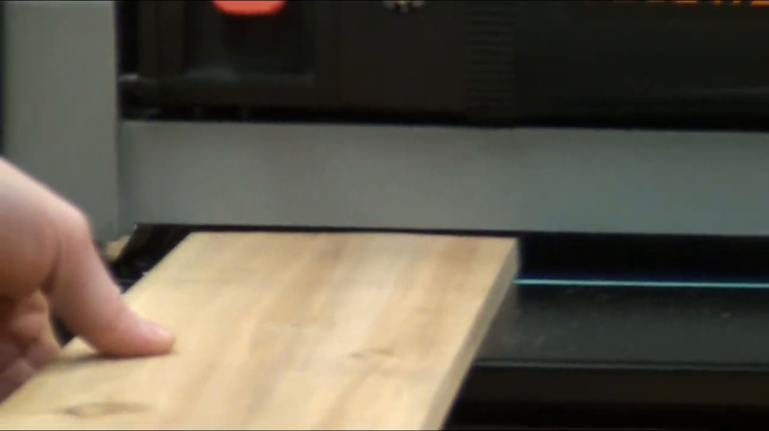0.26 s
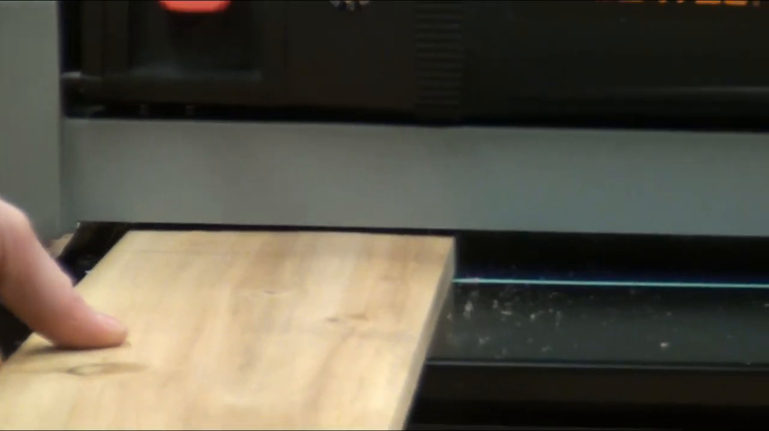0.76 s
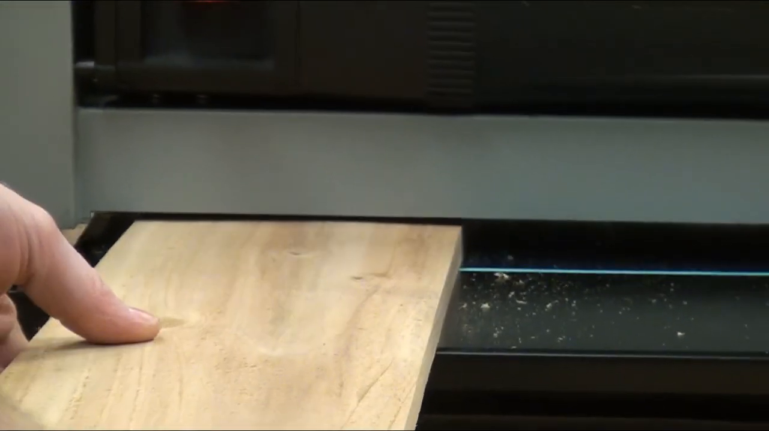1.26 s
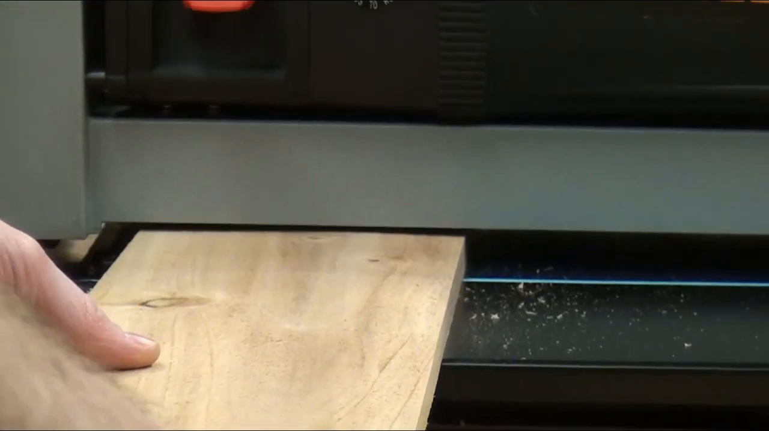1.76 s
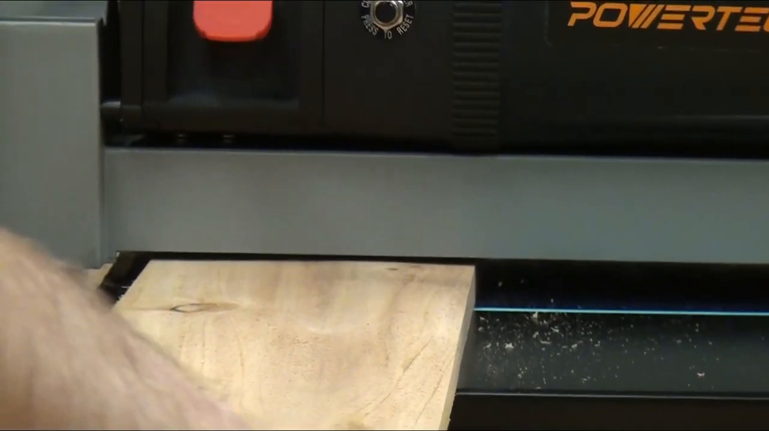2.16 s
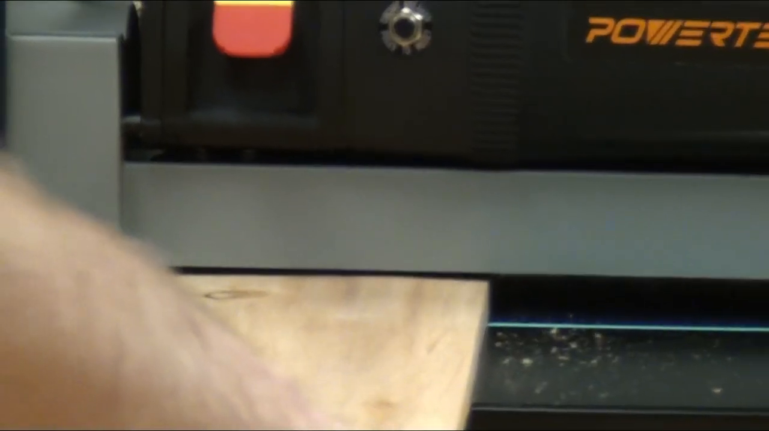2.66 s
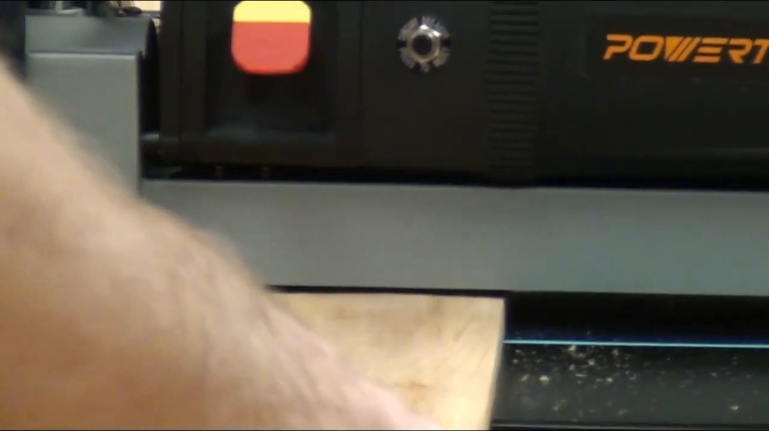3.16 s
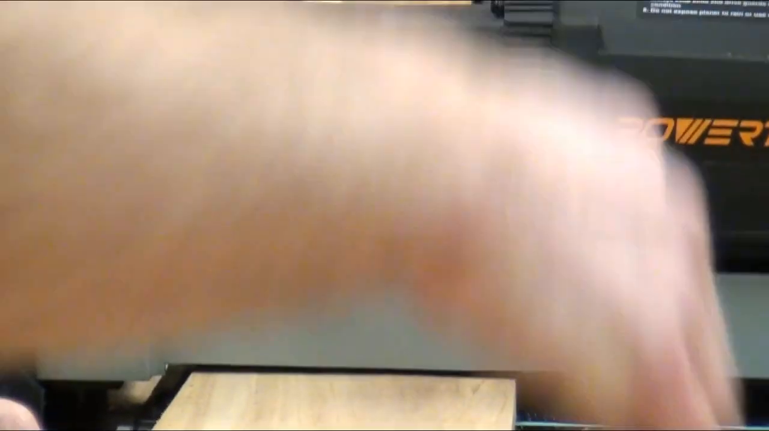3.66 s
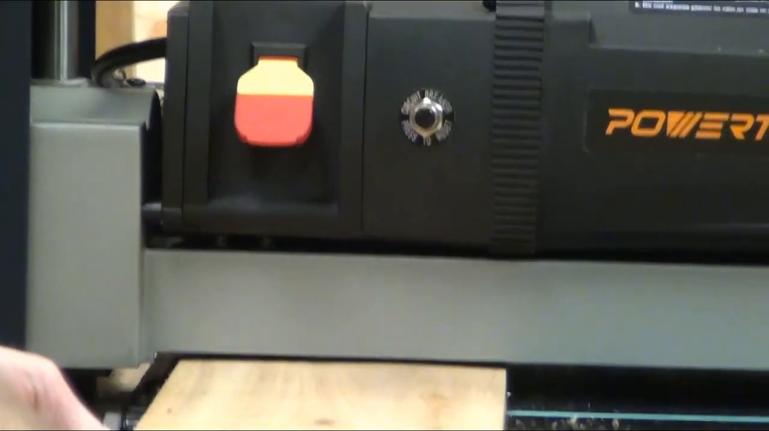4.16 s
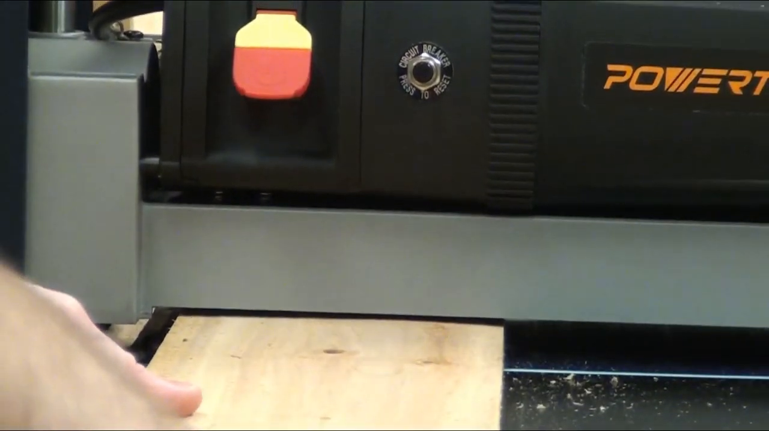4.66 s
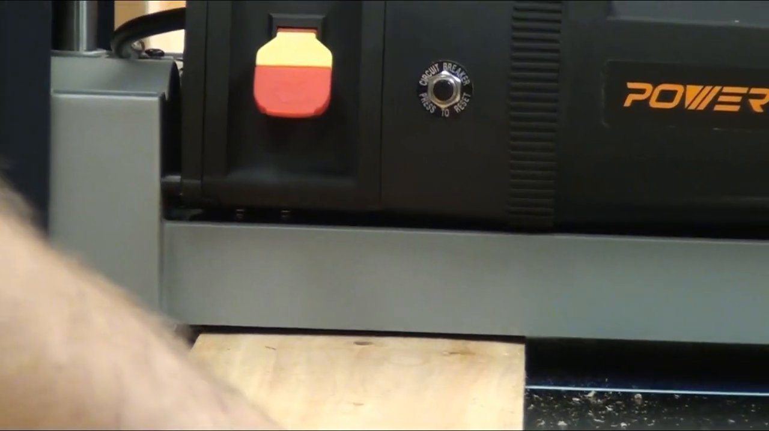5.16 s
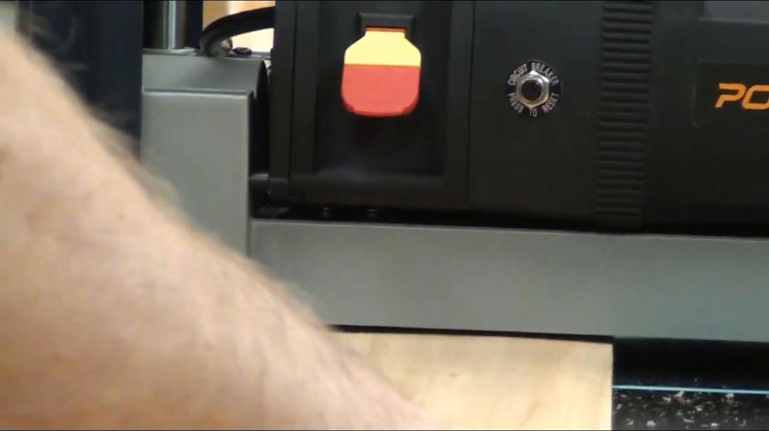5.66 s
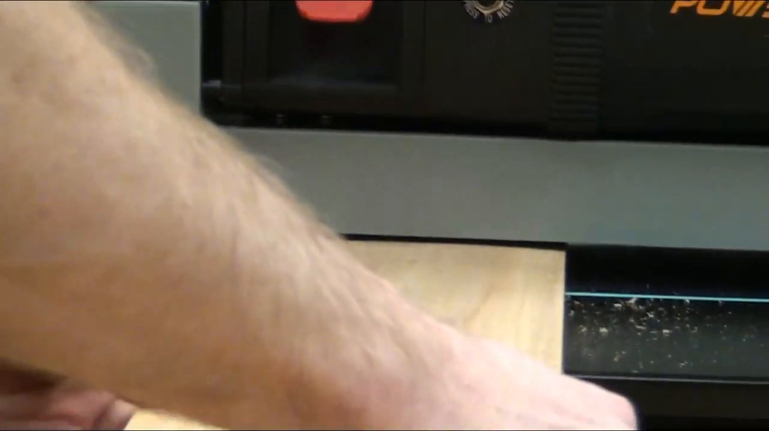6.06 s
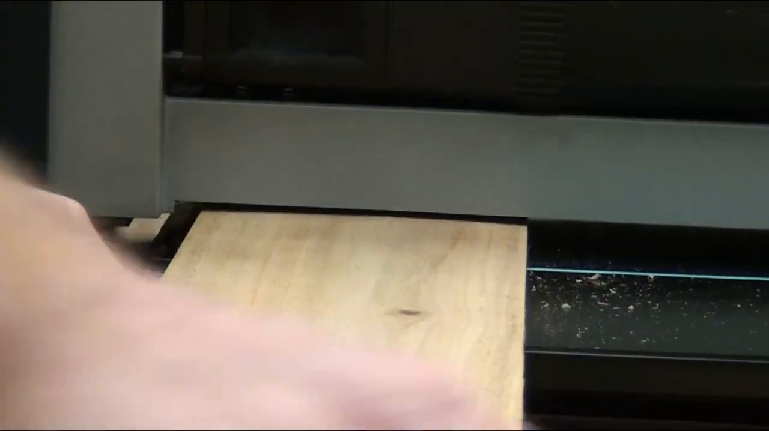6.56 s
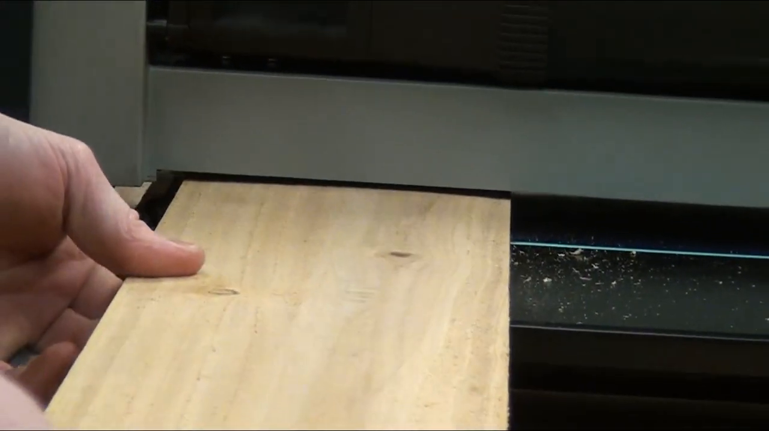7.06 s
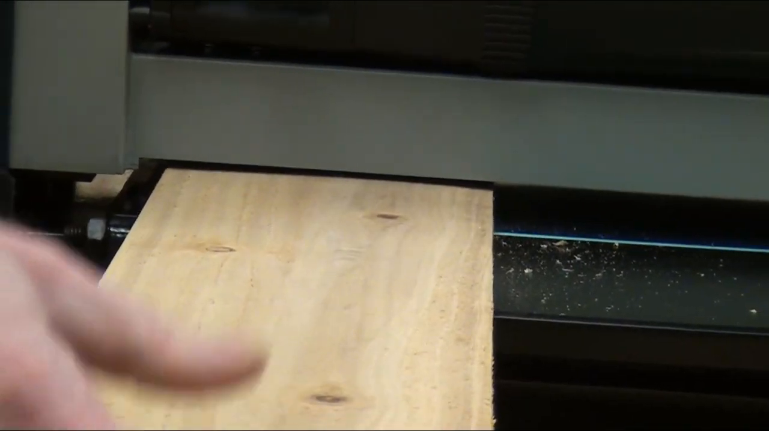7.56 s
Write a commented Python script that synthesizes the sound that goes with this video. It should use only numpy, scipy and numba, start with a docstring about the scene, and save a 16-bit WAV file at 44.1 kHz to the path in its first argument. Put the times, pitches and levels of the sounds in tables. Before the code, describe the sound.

An electric wood planer drops slightly in pitch as a board feeds in, then drones on with a harsh, steady cutting whine.

```python
"""Small workshop: a benchtop planer close to a handheld camera. It idles, then a board meets the
two knives. The cutterhead slows under load and sings a stack of overtones that fade in and out
as board, arms and camera move. The belt-driven motor whines and blows air; chips hiss at each
knife blow. A limiter holds the peaks down."""
import sys
import numpy as np
from scipy import signal
from scipy.fft import rfft, irfft
from scipy.io import wavfile
from scipy.ndimage import map_coordinates
from numba import njit

SR = 44100
rng = np.random.default_rng(int(sys.argv[2]) if len(sys.argv) > 2 else 0)


def unload_wav(signal):
    """Save mono or channel-first audio to the path in sys.argv[1] as 16-bit WAV at rate SR, clipped to [-1, 1]."""
    wavfile.write(
        sys.argv[1],
        SR,
        np.round(np.clip(np.atleast_2d(signal).T, -1, 1) * 32767).astype(np.int16),
    )


N = 343977

BITE_S, RECOVER_S = 0.379, 1.34  # knives reach the wood; time constant of the air's recovery
STEADY_HUM_DB = -43.5

# Stereo width: freq_hz, side_minus_mid_db
WIDTH = [(60, -10), (110, -3), (200, -15.5), (380, -9.5), (700, -13.5), (1290, -20.5), (2380, -12),
         (4400, -13), (8120, -16.5), (15000, -104)]
# Camera turning: time_s, left_minus_right_db
CAMERA_PAN = [(.4, -0.5), (.6, 1.8), (2.7, -0.3), (3.2, -0.5), (7.8, -0.5)]
# Brightness, duller early in the cut: time_s, treble_shelf_db, top_overtones_db
BRIGHTNESS = [(0, 7, -6), (.5, 8, -5.5), (2.4, 9.5, -7.5), (3.2, 11.5, -2)]
# Air rush spectrum: freq_hz, relative_density_db
AIR_SPECTRUM = [(20, -60), (110, -44), (240, -10), (400, -7), (700, -6), (950, 4), (1260, -7.5),
                (2500, -3.5), (5300, -8.5), (9700, -19.5), (11500, -30), (15500, -42)]
# Brief dips of air and chip hiss: time_s, gain_db
HISS_DIPS = [(2.4, -3), (2.65, 1), (2.71, -4.5), (2.8, -3), (2.86, -2), (6.1, 0.5), (6.2, -2.5),
             (6.28, 0.5), (7.45, -0.5), (7.56, -4.5), (7.7, -1)]
# Motor, belt and gear tones: cycles_per_head_turn, relative_db
MOTOR_TONES = [(3.09, 0), (6.18, 0), (9.27, -10), (1.79, -10), (2.48, -13), (4.09, -12), (5.09, -10),
               (5.46, -8), (6.77, -11), (27.88, -10)]
# Motor levels: time_s, shaft_hum_db, upper_tones_db
MOTOR_LEVELS = [(0, -38, -47), (.38, -39, -53), (.42, -54, -54), (1.0, -45.5, -47), (1.6, -41.5, -49),
                (2.5, -36, -51), (3.9, -41.5, -36.5), (4.6, -34.5, -41), (5.3, -36, -36.5),
                (6.27, -54.5, -47), (6.9, -39, -40.5), (7.8, -45.5, -41)]
# Chip hiss spectrum: freq_hz, relative_density_db
CHIP_SPECTRUM = [(600, -25), (950, -2.5), (1250, -12.5), (1900, -6.5), (2900, -10.5), (4500, -14),
                 (6300, -27.5), (8750, -23), (10500, -28), (11500, -39), (15500, -40.5)]
# Levels of the cut: time_s, chip_db, knife_treble_db
CUT_LEVELS = [(.39, -47.5, -33.5), (.8, -45.5, -32.5), (1.4, -48.5, -34.5), (2.0, -46.5, -34),
              (2.6, -51.5, -32.5), (2.75, -49, -36.5), (3.7, -49, -40), (4.7, -46, -39), (5.6, -52.5, -38),
              (6.3, -57, -38), (7.5, -48, -37.5), (7.8, -49, -39)]
# Cutterhead speed, sagging under load: time_s, rotation_hz
HEAD_SPEED = [(0, 167.1), (.39, 167.1), (.51, 165.4), (.78, 160.3), (.98, 157.4), (1.25, 154.5),
              (1.45, 153), (1.63, 152.1), (1.9, 152.3), (2.62, 153.4), (2.99, 152), (3.7, 151.9),
              (4.1, 152.4), (4.86, 154), (5.1, 153.6), (5.66, 151.3), (5.98, 150.6), (6.3, 150.6),
              (7.04, 152.3), (7.25, 151.7), (7.8, 151.6)]
# Strong overtones: order (cycles per head turn)
STRONG_ORDERS = (1, 2, 4, 6, 7, 8, 9, 10, 12, 14, 16, 18, 19, 20, 21, 22, 24, 26, 28, 30, 32, 40, 42, 44,
                 46, 48)
# Their levels, one row per order: idle_db, cutting_db
STRONG_LEVELS = [(-56, -57), (-35, -50), (-32, -42), (-31, -29), (-62, -46), (-48, -38.5), (-44, -47),
                 (-40, -35.5), (-44, -33.5), (-60, -35.5), (-44, -35), (-48, -33.5), (-57, -43), (-62, -37),
                 (-52, -45), (-57, -38), (-59, -40.5), (-51, -45.5), (-48, -41), (-53, -46), (-47, -49.5),
                 (-62, -47.5), (-62, -49), (-62, -54.5), (-64, -61.5), (-62, -55)]
# One strong overtone rings out or fades: start_s, length_s, order, gain_db
OVERTONE_SWELLS = [(0.39, 0.2, 6, -5.5), (0.39, 0.52, 32, 7), (0.39, 0.58, 20, -10), (0.393, 0.22, 16, 4.5),
                   (0.406, 0.07, 6, -21), (0.41, 0.31, 9, 11.5), (0.44, 0.63, 42, -2),
                   (0.45, 0.12, 30, -12), (0.45, 1.4, 28, -7), (0.56, 0.18, 8, 5.5), (0.623, 0.34, 12, -6),
                   (0.67, 0.12, 4, 9), (0.75, 1.1, 8, -2.5), (0.76, 2.49, 7, -13), (0.82, 1.6, 18, 5.5),
                   (0.84, 0.087, 44, 14), (0.9, 0.14, 16, -13), (0.92, 1.3, 22, -6.5), (0.93, 0.2, 6, -7),
                   (1.01, 0.65, 30, -14), (1.15, 1.24, 48, 8.5), (1.17, 0.44, 44, 8), (1.21, 0.11, 12, 5),
                   (1.256, 1.26, 14, -9), (1.31, 0.86, 10, 3.5), (1.342, 0.07, 12, -9),
                   (1.36, 0.21, 40, -5), (1.366, 0.11, 6, -6), (1.51, 1.1, 46, 14.5),
                   (1.54, 0.69, 12, -9.5), (1.57, 0.68, 9, -6.0), (1.606, 0.08, 22, 10),
                   (1.61, 0.61, 44, 10), (1.685, 0.57, 20, 6.5), (1.756, 0.4, 16, 5.5), (1.84, 0.15, 42, 2),
                   (1.93, 1.1, 19, -22), (1.95, 0.61, 26, -13), (1.98, 0.58, 8, -12), (2.196, 0.19, 40, -6),
                   (2.37, 0.49, 12, 2.5), (2.46, 0.26, 30, 6.5), (2.55, 0.24, 6, -5.5),
                   (2.603, 0.28, 14, 5.5), (2.637, 0.19, 18, 4.5), (2.684, 0.17, 1, -8),
                   (2.699, 0.49, 10, 5), (2.76, 0.51, 46, 9), (2.79, 0.16, 18, -5), (2.78, 1.62, 28, -5),
                   (2.84, 0.17, 16, -6), (3.01, 0.26, 24, -3), (3.1, 0.58, 42, 3.5), (3.107, 0.31, 20, 7.5),
                   (3.15, 0.64, 12, -5), (3.21, 1.9, 21, -20), (3.25, 0.22, 16, -5), (3.25, 0.6, 40, -8),
                   (3.317, 0.33, 24, 6.5), (3.413, 0.45, 14, -2.5), (3.45, 0.44, 10, 2),
                   (3.554, 0.27, 18, -10), (3.796, 1.2, 20, -2.5), (3.853, 0.21, 22, 6), (3.86, 1.4, 24, 5),
                   (3.88, 1, 42, -17), (3.96, 0.11, 20, -11), (4.253, 0.66, 16, -6.5),
                   (4.27, 0.96, 18, -7.5), (4.37, 0.42, 32, 7.5), (4.497, 0.2, 24, 3.5),
                   (4.53, 0.7, 6, -5.5), (4.554, 0.13, 6, -7), (4.57, 0.08, 22, -10),
                   (4.582, 0.15, 12, -11), (4.71, 0.39, 44, 5.5), (4.728, 0.44, 22, 6),
                   (4.763, 0.3, 26, 10), (4.83, 1.3, 40, 3), (4.87, 0.18, 18, 6), (5.007, 0.069, 12, -12),
                   (5.02, 2.4, 21, -12), (5.1, 0.18, 14, 6), (5.145, 0.43, 10, 6), (5.163, 0.1, 16, 6.5),
                   (5.17, 0.31, 24, -6), (5.31, 0.24, 12, -5), (5.397, 0.12, 16, 4), (5.4, 0.37, 14, -6),
                   (5.408, 0.69, 44, 4), (5.427, 0.1, 18, -8), (5.578, 0.81, 16, -9),
                   (5.622, 0.25, 18, 4.5), (5.63, 1.96, 7, 7), (5.75, 0.94, 22, -2), (5.8, 0.95, 6, -2.5),
                   (5.894, 0.88, 44, 7.5), (5.902, 0.52, 20, 5.5), (5.94, 0.31, 30, 5.5),
                   (5.974, 0.43, 18, -5), (5.983, 0.5, 24, 5), (6.134, 0.1, 6, -4), (6.16, 0.43, 42, -12),
                   (6.27, 0.51, 10, -8), (6.277, 0.15, 12, -11), (6.37, 0.36, 30, 6.5),
                   (6.433, 0.17, 14, -10), (6.6, 1.3, 40, -11), (6.61, 0.68, 48, -8.5),
                   (6.62, 0.43, 7, -11), (6.717, 0.7, 12, -8), (6.72, 0.91, 42, -14), (6.777, 0.33, 19, 11),
                   (6.77, 0.46, 28, -8), (6.787, 0.17, 18, -9), (6.9, 0.32, 20, 6), (6.94, 0.38, 46, 15),
                   (6.95, 0.28, 12, -1), (7.078, 0.32, 14, 5), (7.3, 0.23, 24, -4), (7.41, 0.34, 4, -9),
                   (7.413, 0.39, 10, -8), (7.45, 0.24, 6, -6.5), (7.55, 0.25, 42, 7.5),
                   (7.556, 0.13, 22, -15), (7.625, 0.16, 30, 8), (7.68, 0.1, 16, -9.5)]
# Free-running knives beating the air: order, level_db
IDLE_TONES = [(5, -59), (11, -48)]
# Knife blows through board and hood: freq_hz, overtone_db
BLOW_SPECTRUM = [(300, -48), (1000, -36), (2000, -30), (3300, -33.5), (3700, -43.5), (4300, -48),
                 (5500, -55.5), (6400, -59.5), (7500, -56.5), (9000, -63), (10500, -69), (11500, -77),
                 (15000, -83)]
# One knife cuts deeper: time_s, odd_overtone_db
KNIFE_MISMATCH = [(0.39, -7), (.74, -11), (.76, -13), (1.5, -14), (3.0, -26), (5.6, -10), (6.3, -14.5),
                  (7.8, -14)]
# Overtones dip briefly and build back, at the start of the cut and again just after: start_s, gain_db
OVERTONE_DIPS = [(0.378, -3.5), (0.741, -3)]


def undb(db):
    return 10 ** (np.asarray(db) / 20)


def at_hz(table, hz):
    """Spectrum value on a log-frequency axis."""
    freq_hz, db = np.transpose(table)
    return np.interp(np.log(hz), np.log(freq_hz), db)


def in_time(table):
    """Each value column of a time table, per sample."""
    time_s, *columns = np.transpose(table)
    return [np.interp(np.arange(N) / SR, time_s, column) for column in columns]


def walk(rate_hz, glide_steps=0):
    """Smooth random curve, spread near 1; a glide speeds it up."""
    knots = rng.standard_normal(int(N / SR * 60) + 3)
    position = np.arange(0, N, 64) / SR * rate_hz + glide_steps
    return 1.1 * map_coordinates(knots, [position], order=3).repeat(64)[:N]


def stereo(mid, side):
    return np.array([mid + side, mid - side])


def tone(phase, hz, scatter, rate_hz, glide_steps=0):
    """Steady direct path plus wandering reflections, unlike in each ear."""
    carrier = np.exp(1j * phase)
    mid = 1 + scatter * (walk(rate_hz, glide_steps) + 1j * walk(rate_hz, glide_steps))
    side = undb(at_hz(WIDTH, hz)) * (walk(rate_hz / 2) + 1j * walk(rate_hz / 2)) / np.sqrt(2)
    return np.sqrt(2 / (1 + 2 * scatter ** 2)) * stereo((carrier * mid).real, (carrier * side).real)


def hiss(spectrum, ref_band_hz, flicker_db):
    """Noise whose octaves flicker independently; mid rms near 1 in the reference band."""
    hz = np.maximum(np.arange(N // 2 + 1) * SR / N, 1)
    shape = undb(at_hz(spectrum, hz))
    mid, side = (rfft(rng.standard_normal(N)) * shape for _ in range(2))
    channels = stereo(mid, side * undb(at_hz(WIDTH, hz)))
    in_band = (hz > ref_band_hz[0]) & (hz < ref_band_hz[1])
    rms = np.sqrt(2 * np.sum(np.abs(mid[in_band]) ** 2)) / N
    out = 0
    for octave in range(4, 15):
        band = np.cos(np.pi / 2 * np.clip(np.log2(hz) - octave, -1, 1)) ** 2
        flicker = undb(flicker_db * (walk(9.7) + walk(2.496)))
        out = out + flicker * irfft(channels * band, N)
    return out / rms


@njit
def peak_follower(x, attack, release):
    """Envelope: fast rise, slow fall."""
    envelope, level = np.empty(len(x)), 0.
    for i in range(len(x)):
        level += (x[i] - level) * (attack if x[i] > level else release)
        envelope[i] = level
    return envelope


def air_rush(cutting, duck, hum_db):
    """Air blown by the motor: ducks at the bite; in the cut its low roar follows the shaft hum."""
    idle_db, cutting_db, duck_db, roar_hz = -35.5, -43, -4.5, 750
    level_db = idle_db + cutting * (cutting_db - idle_db) + duck_db * duck
    air = undb(level_db) * hiss(AIR_SPECTRUM, ref_band_hz=(627, 874), flicker_db=0.51)
    roar = signal.sosfiltfilt(signal.butter(2, roar_hz, fs=SR, output="sos"), air)
    roar_db = cutting * (3 + 0.22 * (hum_db - STEADY_HUM_DB))
    return air - roar + roar * undb(roar_db)


def motor(head_rad, head_hz, cutting, hum_db, upper_db):
    """Tones geared to the head by the belt; those below the shaft hum hold level in the cut."""
    lower_db = hum_db + cutting * (STEADY_HUM_DB - hum_db)
    out = 0
    for ratio, relative_db in MOTOR_TONES:
        group_db = upper_db if ratio > 5.2 else hum_db if ratio > 3 else lower_db
        whine = tone(ratio * head_rad, ratio * head_hz.mean(), scatter=0.13, rate_hz=3.99)
        out = out + undb(group_db + relative_db) * whine
    return out


def chip_hiss(head_rad, level_db):
    """A puff of chips at each blow; one knife throws more."""
    puffs = 1 + .5 * np.cos(2 * head_rad) + .25 * np.cos(head_rad)
    return undb(level_db) * puffs * hiss(CHIP_SPECTRUM, ref_band_hz=(4600, 9000), flicker_db=1.3)


def head_whistle(head_rad, head_hz, top_db):
    """Faint whistle locked to the head, strongest near its resonance."""
    order, base_db, resonance_hz, width_hz = 86, -69, 13050, 250
    resonance = 1 / (1 + ((order * head_hz - resonance_hz) / width_hz) ** 2)
    whistle = tone(order * head_rad, resonance_hz, scatter=.8, rate_hz=14)
    return undb(base_db + top_db) * resonance * whistle


def strong_overtone_db(t, cutting, duck):
    """Level per strong order, with swells and fades; the bite ducks the unbalance hum (order 1)."""
    unbalance_duck_db, unbalance_recover_s = -26, 0.58
    level_db = {order: idle_db + cutting * (cutting_db - idle_db)
                for order, (idle_db, cutting_db) in zip(STRONG_ORDERS, STRONG_LEVELS)}
    level_db[1] += unbalance_duck_db * duck ** (RECOVER_S / unbalance_recover_s)
    for start_s, length_s, order, gain_db in OVERTONE_SWELLS:
        edge_s = min(.1 * length_s, .02)
        window = (np.tanh((t - start_s) / edge_s) - np.tanh((t - start_s - length_s) / edge_s)) / 2
        level_db[order] += gain_db * window * cutting
    return level_db


def knife_blows(t, head_rad, head_hz, cutting, strong_db, treble_db, top_db, grain_db):
    """Two blows a turn, summed as overtones; knife mismatch feeds the odd orders."""
    sweep_rad, sweep_top_order = .02, 24  # each rap sweeps through its low orders
    treble_ref_db, whine_db, rebuild_s = -40, 3.5, 0.067
    room_mode_spacing_hz = 45
    glide_steps = np.cumsum(np.abs(np.gradient(head_hz)))[::64] / room_mode_spacing_hz
    mismatch_db, = in_time(KNIFE_MISMATCH)
    out = 0
    for order in [*range(1, 63), *range(64, 97, 2)]:  # top of the whine: even overtones only
        mean_hz = order * head_hz.mean()
        swept = min(order, sweep_top_order)
        smear_rad = (.95 if order <= sweep_top_order else .5) * rng.standard_normal()
        phase = order * head_rad + smear_rad - sweep_rad * swept * (2 * order - swept)
        if order in strong_db:
            gain = undb(strong_db[order] + 1.1 * grain_db)
            out = out + gain * tone(phase, mean_hz, scatter=.12, rate_hz=14)
            continue
        treble_share = np.clip(np.log2(mean_hz / 2500), 0, 1)
        top_share = np.clip(2 * np.log2(mean_hz / 6000), 0, 1)
        cut_db = at_hz(BLOW_SPECTRUM, order * head_hz) + grain_db + top_share * top_db
        cut_db += treble_share * (treble_db - treble_ref_db + whine_db * walk(2.5))
        cut_db += (order % 2) * mismatch_db * (1 - 0.81 * treble_share)
        idle_db = dict(IDLE_TONES).get(order, -66 - order / 4)
        gain = cutting * undb(cut_db) + (1 - cutting) * undb(idle_db)
        # Paths through the hood smear the blow; short waves wander faster.
        rate_hz = 2.527 + 2.564 * treble_share
        smeared = tone(phase, mean_hz, scatter=0.98, rate_hz=rate_hz, glide_steps=order * glide_steps)
        out = out + gain * smeared
    dip_db = sum(gain_db * (t > start_s) * np.exp(-np.maximum(t - start_s, 0) / rebuild_s)
                 for start_s, gain_db in OVERTONE_DIPS)
    return out * undb(dip_db)


def scene():
    """Idle, then cut; the head's angle drives all tones."""
    t = np.arange(N) / SR
    head_hz, = in_time(HEAD_SPEED)
    hum_db, upper_db = in_time(MOTOR_LEVELS)
    chip_db, treble_db = in_time(CUT_LEVELS)
    shelf_db, top_db = in_time(BRIGHTNESS)
    hiss_dip_db, = in_time(HISS_DIPS)
    pan_db, = in_time(CAMERA_PAN)
    head_rad = 2 * np.pi * np.cumsum(head_hz * (1 + 0.000449 * walk(30))) / SR
    cutting = np.clip((t - BITE_S) / 0.017, 0, 1)
    duck = cutting * np.exp(-np.maximum(t - BITE_S, 0) / RECOVER_S)
    grain_db = .7 * (walk(25) + walk(50))  # harder and softer wood

    chips = cutting * chip_hiss(head_rad, chip_db + grain_db)
    whistle = cutting * head_whistle(head_rad, head_hz, top_db)
    air = air_rush(cutting, duck, hum_db)
    strong_db = strong_overtone_db(t, cutting, duck)
    blows = knife_blows(t, head_rad, head_hz, cutting, strong_db, treble_db, top_db, grain_db)
    whine = motor(head_rad, head_hz, cutting, hum_db, upper_db)
    mix = undb(hiss_dip_db) * (air + chips) + whine + whistle + blows

    highs = signal.sosfiltfilt(signal.butter(2, 9000, "high", fs=SR, output="sos"), mix)
    pan = undb(np.array([pan_db, -pan_db]) / 2)
    return pan * (mix - highs) + undb(shelf_db) * highs


def record(dry):
    """Camera's look-ahead limiter, then low and high cut."""
    threshold_db, ratio, attack_s, release_s = -19.5, 4.2, 0.00045, 0.057
    low_cut_hz, high_cut_hz = 62, 15750
    peak = peak_follower(np.abs(dry).max(axis=0), 1 / (attack_s * SR), 1 / (release_s * SR))
    gain = np.minimum(1, undb(threshold_db) / (peak + 1e-9)) ** (1 - 1 / ratio)
    ahead = int(attack_s * SR)
    limited = dry * np.concatenate([gain[ahead:], gain[N - ahead:]])
    limited = signal.sosfilt(signal.butter(1, low_cut_hz, "high", fs=SR, output="sos"), limited)
    return signal.sosfilt(signal.ellip(10, .2, 70, high_cut_hz, fs=SR, output="sos"), limited)


dry = scene()
out = record(dry)
unload_wav(out)
```